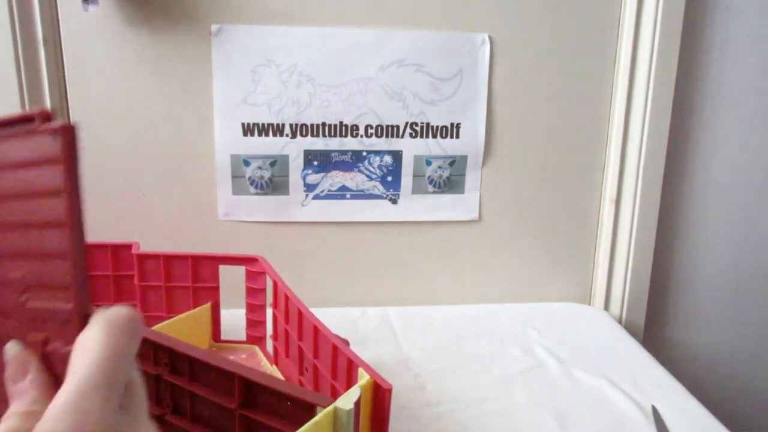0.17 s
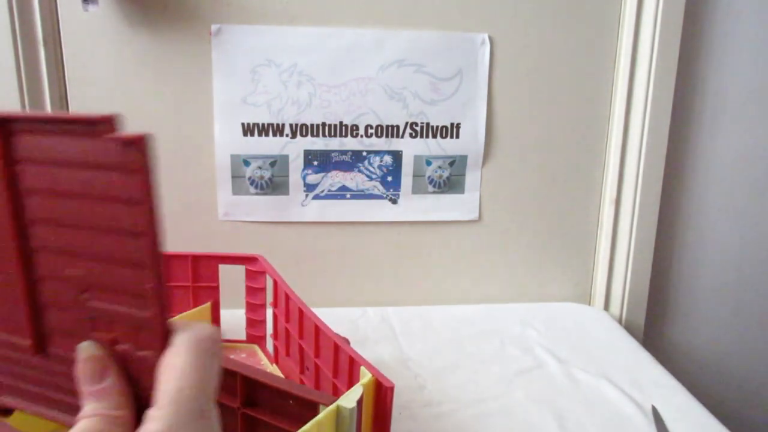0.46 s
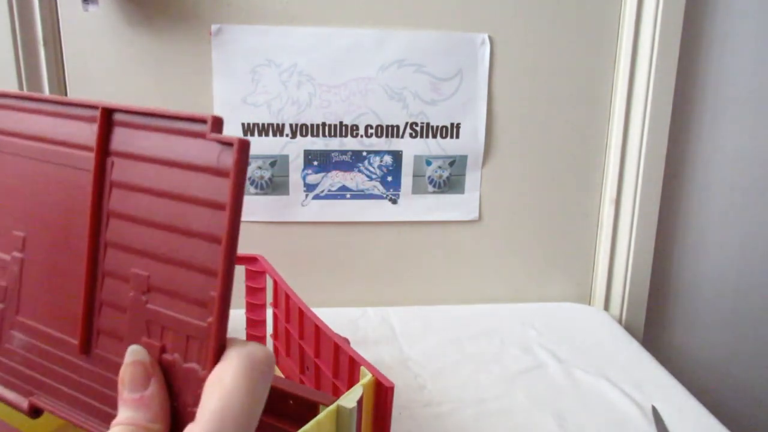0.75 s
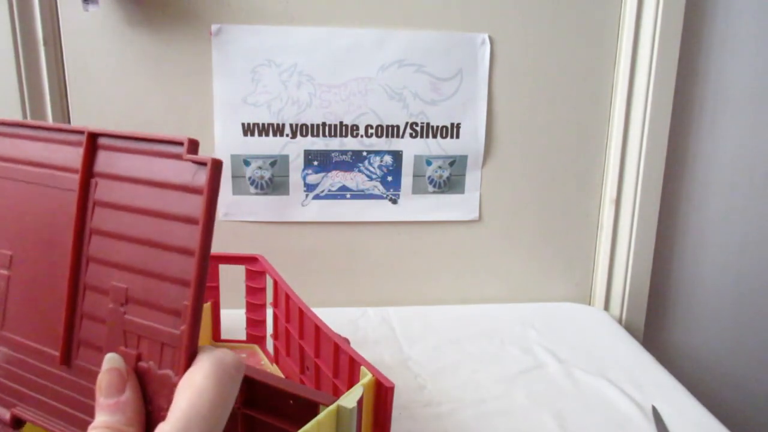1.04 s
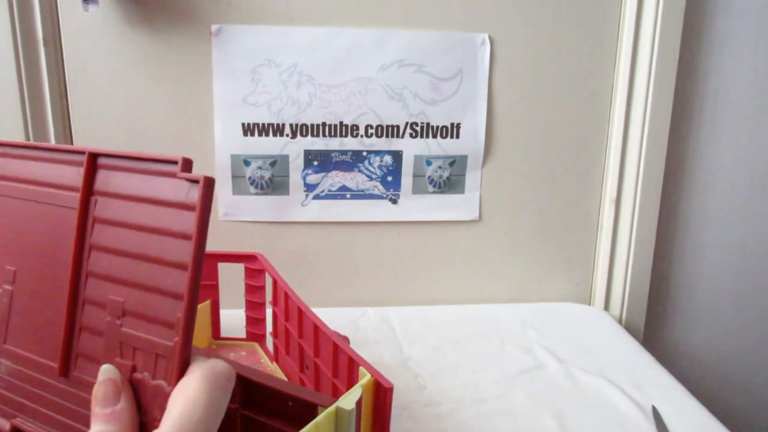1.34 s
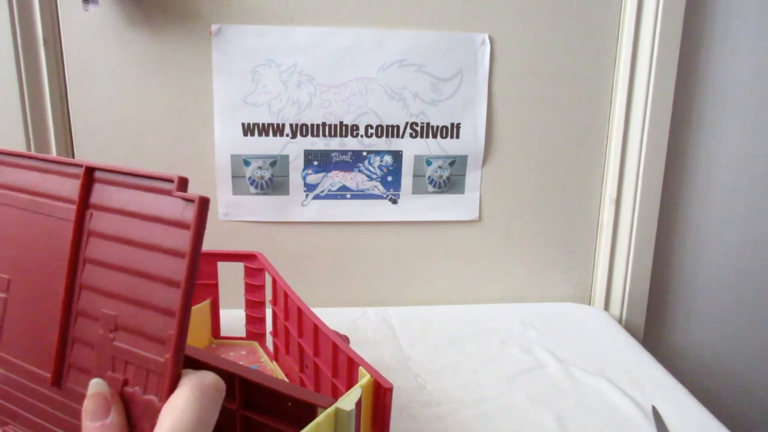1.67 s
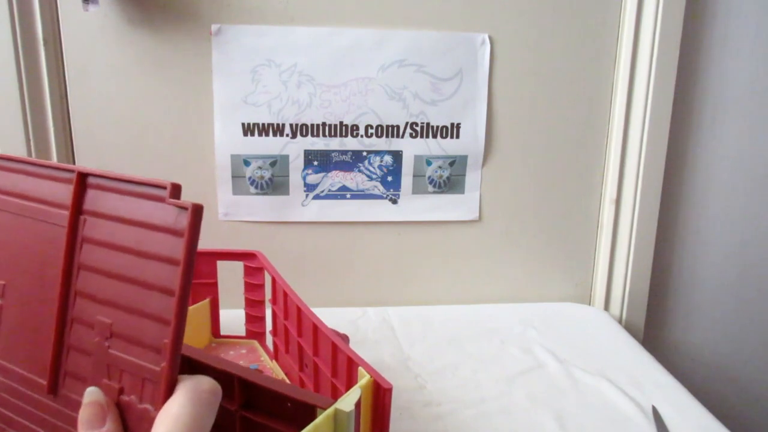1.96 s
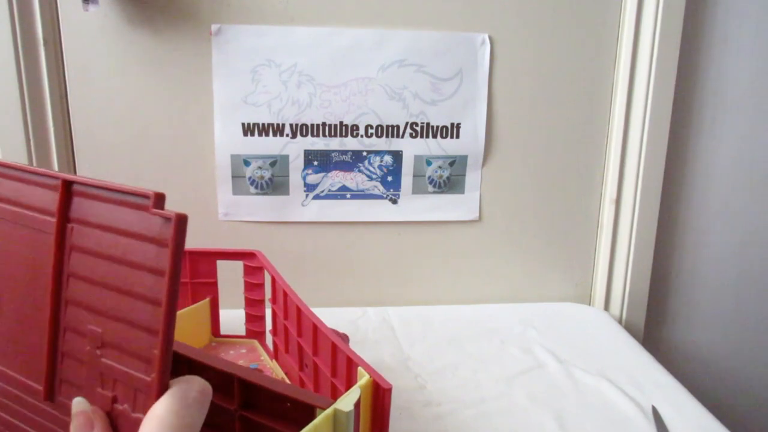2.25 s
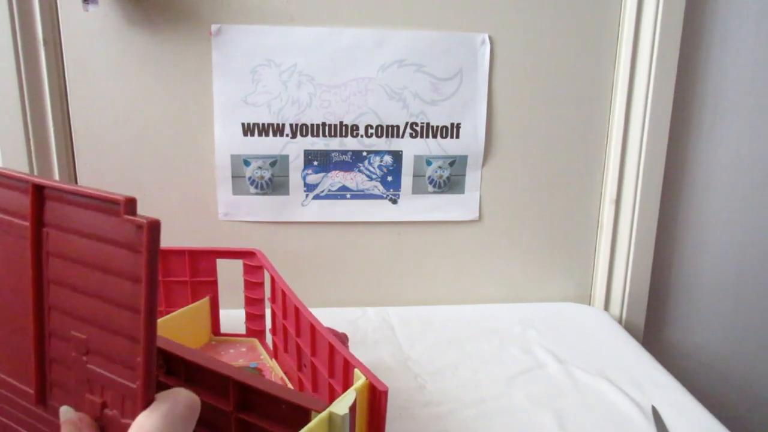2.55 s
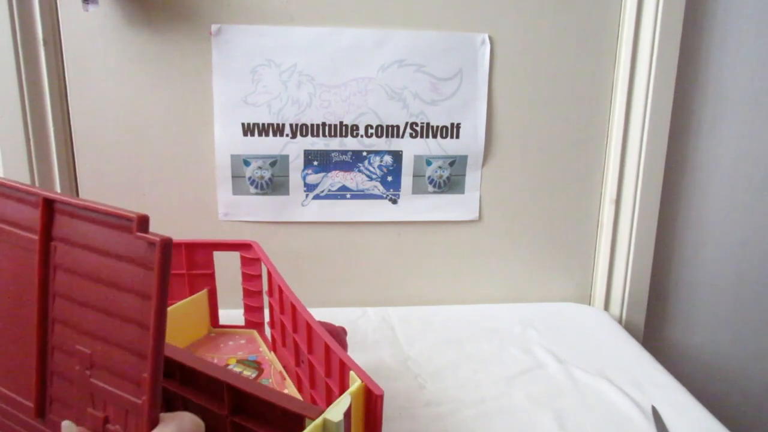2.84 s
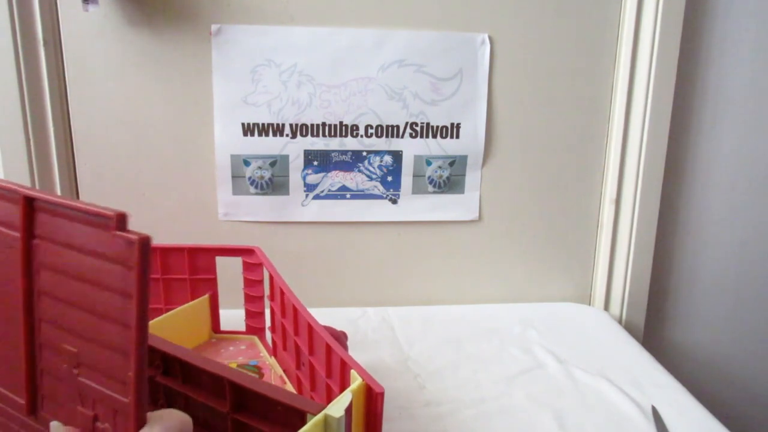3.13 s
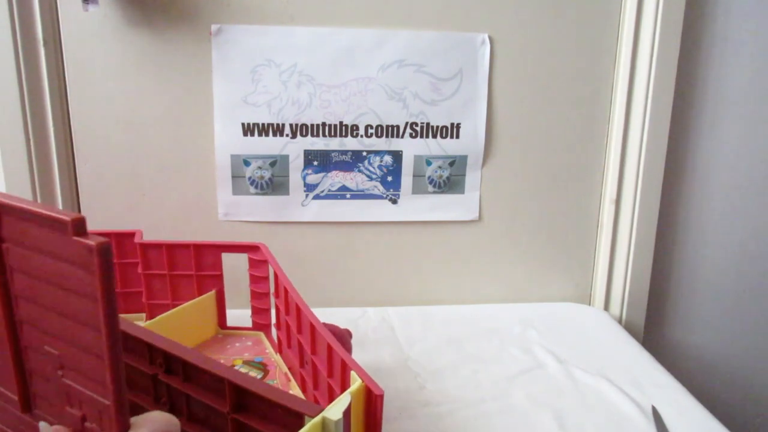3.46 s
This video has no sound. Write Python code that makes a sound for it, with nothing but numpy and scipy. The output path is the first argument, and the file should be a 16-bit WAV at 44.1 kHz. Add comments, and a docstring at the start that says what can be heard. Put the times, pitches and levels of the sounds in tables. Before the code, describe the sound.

A hard plastic panel is fitted onto a toy house: a thud and loud sharp snap at once, hollow knocks just after one second, then faint ticks and rubbing, close microphone in a small room.

```python
"""A sharp snap, then hollow knocks, small ticks and the rubbing of parts, with a thin high hiss later on. Hands
fit a hard plastic roof panel onto a toy house on a table in a small room. Blows and tiny slips set decaying
sines (modes) ringing in the walls, ribs and edges; cracks and slides are shaped noise. Echoes follow; the
background hiss drops at first and then its level mostly climbs."""
import sys
import numpy as np
from scipy import signal
from scipy.fft import rfft, irfft
from scipy.io import wavfile
from scipy.ndimage import uniform_filter1d

SR = 44100
rng = np.random.default_rng(int(sys.argv[2]) if len(sys.argv) > 2 else 0)


def wrap_up_sound(samples):
    """Save the sound to the file named by the first command line argument, as 16-bit audio."""
    columns = np.atleast_2d(samples).T
    # keep every value between -1 and 1, then stretch to whole-number steps
    tamed = np.clip(columns, -1, 1)
    steps = np.round(tamed * 32767).astype(np.int16)
    wavfile.write(sys.argv[1], SR, steps)


N = 158760  # length in samples

# In all tables, a ring time is how long a tone takes to fall by 60 dB.
# Knocks and clicks of plastic on plastic. Each row: start in seconds, blow level in dB, then body, middle
# and tick levels in dB relative to it (before the trims below), favoured body tone in Hz, favoured middle
# tone in Hz, share of the ring time left by the grip (1 = free).
CONTACTS = [(0.0, -9.5, -8, -22, -26.5, 120, 1230, 1.83), (0.011, -25, 2.5, -9.5, -45, 115, 1500, 1.15),
            (0.0848, 3, -18, -17, -8.5, 760, 3000, .7), (0.0885, -3.5, -13.5, -15, -17, 740, 2900, .9),
            (0.13, -7, -20.5, -13.5, -16.5, 520, 1693, 1.26),
            (0.224, -19.5, -27.5, -18.5, -12, 450, 1650, 2.7), (0.3112, -18, -9.5, -8, -7, 430, 1930, 0.45),
            (0.325, -21.5, -13, -13, -7, 390, 1700, 1.9), (0.3403, -20, -13, -1.5, -26, 580, 2080, 0.7),
            (0.3445, -30, -1.5, -3, -32, 300, 1780, 0.54), (0.355, -38.5, -4.5, 0, -2, 520, 1760, 1.2),
            (0.641, -29.5, -1, -17.5, -30, 276, 876, 1.1), (0.666, -21, -8, -25.5, -40.5, 304, 902, 1.1),
            (0.682, -35, -2.5, -12, -37, 400, 900, 0.62), (0.714, -28.5, -3.5, -30, -38, 340, 915, .45),
            (0.831, -34, -10.5, -13, -32.5, 670, 910, 0.32), (0.850, -26, -14.5, -14, -35, 350, 1090, 1.4),
            (0.878, -32, -6.5, -8.5, -32.5, 160, 900, 1.4), (1.133, -11, -2.5, -6, -22.5, 523, 1370, 0.8),
            (1.1457, -17.5, -5.5, -23, -52, 337, 1400, 0.56), (1.16, -15, -17, -23, -25, 400, 1700, 1.6),
            (1.264, -9.5, -9, -16.5, -41, 450, 1210, 0.52), (1.276, -19.5, -4, -20, -43, 415, 1035, 1.48),
            (1.351, -29.5, -6.5, -14, -28, 500, 860, 0.66), (1.495, -32, -19, -4, -18.5, 1200, 777, 1.4),
            (1.518, -27.5, -10.5, -17, -33, 185, 2380, 1.5), (1.796, -37, -13.5, -21.5, -27, 510, 1700, .9),
            (1.821, -37, -14, -14, -21, 460, 864, 1), (2.058, -34, -10.5, -13, -20, 200, 1290, 0.98),
            (2.121, -26, 1, -5.5, -36, 670, 1260, 1.08), (2.126, -20, 3.5, -8, -40, 370, 1400, 0.24),
            (2.136, -25, -2.5, -21, -40.5, 200, 1380, 1.2), (2.151, -28, -4, -17, -40, 353, 1380, 1.06),
            (2.263, -33.5, -6, -8, -18, 390, 2340, 0.77), (2.428, -26, -13, -10, -22, 250, 1400, 1.2),
            (2.512, -28, -26, -5, -21, 1400, 920, 0.65), (2.518, -30, -17, -4, -16, 770, 1000, .9),
            (2.575, -25.5, -5, -13, -25, 320, 1100, 0.52), (2.610, -24.5, -6, -9, -36, 390, 900, 0.38),
            (2.622, -29, -3.5, -12, -31, 230, 1500, 0.87), (2.712, -24, -22, -16, -21, 530, 1000, 1.8),
            (2.759, -26, -15, -8.5, -18.5, 540, 1810, 1.1),
            (2.856, -30.5, -15.5, -9, -17.5, 509, 2000, 1.5), (2.93, -26.5, -9.5, -21, -17, 480, 902, 0.54),
            (2.996, -20.5, -11, -10.5, -12.5, 590, 1240, 1.2),
            (3.012, -14, -10.5, -10, -22.5, 490, 2220, .9), (3.348, -36.5, -10, -9.5, -11.5, 500, 1300, 1),
            (3.43, -34, -3, -11, -32.5, 540, 1300, 0.6), (3.467, -29.5, -17, -9, -10, 530, 1200, 0.62),
            (3.489, -34, -3.5, -19, -12, 160, 570, 1.2), (3.56, -26, -10, -12.5, -12.5, 490, 1560, 1.2),
            (3.569, -25, -6.5, -8.5, -30, 360, 1250, 0.47)]
# Modes of the hollow walls. Each row: tone in Hz, relative level in dB, ring time in seconds before damping.
WALLS = [(80, -10.5, 0.16), (138.1, -2, 0.11), (210, -0.5, 0.14), (253.3, 0.5, 0.11), (346.3, -3, 0.12),
         (399.7, -1, 0.1), (522, -3, 0.12), (600.4, -4.5, 0.083), (708.5, 3, 0.079), (814, -6, 0.088)]
# Modes of the stiff ribs. Each row: tone in Hz, relative level in dB, ring time in seconds before damping.
RIBS = [(913, 5.5, .025), (1154, -3.5, 0.031), (1365.5, -3.5, .045), (1688, -4.5, 0.032),
        (1970, -3.5, 0.027), (2261, -4.5, 0.057), (2635, -3.5, .03), (3013, -3, 0.041), (3350, -4.5, 0.048)]
# Modes of the thin edges. Each row: tone in Hz, relative level in dB, ring time in seconds before the limit.
EDGES = [(3250, -1, 0.0073), (4050, -0.5, .009), (5120, 1, 0.0065), (6510, -1.5, .007), (7100, 6.5, 0.002),
         (8960, 14, 0.0046), (10240, -7.5, 0.0081), (11070, -6, 0.0069), (12600, 1.5, 0.004),
         (15200, 10, 0.0035)]
# Colour of the noisy crack and its tail. Each row: frequency in Hz, relative level in dB per Hz.
CRACK_COLOUR = [(710, -35.5), (1200, -6.5), (2070, -15), (2480, -11), (2980, -5.5), (5310, -15.5),
                (9470, -18), (14200, -29.5), (15500, -25)]
# Harder ticks favour higher edge tones. Each row: tick level in dB, favoured tone in Hz.
BRIGHTER = [(-42.5, 4300), (-23, 6600), (-9, 11000)]
# Level of the room noise over time. Each row: time in seconds, level in dB before ROOM_NOISE_DB is added.
BACKGROUND = [(0.0, -53), (0.18, -92.5), (0.33, -72), (0.56, -71), (1.06, -67.5), (2.58, -61.5),
              (3.27, -62), (3.6, -62)]
# Colour of the room noise. Each row: frequency in Hz, relative level in dB per Hz.
ROOM_NOISE = [(15, -49.5), (25, -13), (59, -11.5), (96, -8), (193, -7.5), (804, -15), (919, -14.5),
              (1200, -18), (1570, -16), (2490, -21.5), (3000, -23.5), (10100, -31.5), (14300, -38),
              (15500, -55.5)]
# Faint narrow bands in the room noise. Each row: centre in Hz, width in Hz, level in dB relative to the noise.
WHINES = [(874, 51, -12), (1550, 38, -12)]
# Strokes of parts rubbing. Each row: start in seconds, length in seconds, body, middle and treble levels in dB
# (before the drag levels below), favoured body tone in Hz, favoured middle tone in Hz.
RUB = [(0.116, 0.083, -37.5, -40, -50.5, 405, 1470), (0.312, 0.066, -40, -37.5, -47.5, 390, 1990),
       (0.635, 0.096, -48, -54, -75.5, 410, 877), (0.853, 0.072, -57, -63, -77, 640, 2200),
       (0.865, 0.087, -57, -54, -74, 940, 940), (0.904, 0.19, -58, -55.5, -72, 400, 940),
       (1.271, 0.094, -37, -52, -70, 315, 1010), (1.344, 0.17, -53.5, -59, -80, 550, 1000),
       (1.478, 0.08, -39, -50.5, -70, 420, 993), (1.777, 0.078, -45, -60, -75, 400, 1000),
       (1.912, 0.078, -51, -58.5, -83, 345, 1000), (2.055, 0.1, -47, -54.5, -65, 440, 1700),
       (2.123, 0.071, -46.5, -57, -84, 520, 1400), (2.262, 0.034, -55, -66, -78, 570, 2000),
       (2.345, 0.072, -50.5, -52.5, -61, 540, 2070), (2.396, 0.13, -45.5, -45.5, -65, 550, 1260),
       (2.508, 0.024, -40, -44, -51, 710, 2880), (2.563, 0.1, -43, -61, -79, 215, 1000),
       (2.669, 0.19, -43, -44, -63.5, 556, 1700), (2.923, 0.069, -41.5, -53, -61, 530, 990),
       (2.994, 0.061, -34, -40.5, -56.5, 1140, 1090), (3.162, 0.098, -56, -74, -67, 530, 1183),
       (3.295, 0.097, -44, -53, -67, 560, 980), (3.428, 0.078, -47, -67, -69, 480, 1200)]
# Fingertip slides with a thin high hiss. Each row: time in seconds, level in dB.
SLIDE = [(2.3, -82), (2.36, -58.5), (2.42, -61), (2.47, -87), (2.55, -63), (2.63, -95)]

# How modes share a blow: spread around the favoured tone, weakest share, chance per mode and blow
TONE_OCTAVES, EDGE_OCTAVES, FAR_DB = 0.52, 0.34, -15.5
SCATTER_DB, DETUNE = 3, 0.015  # the grip shifts each mode a little from blow to blow
# Contacts: level trims, longest ring times before the grip acts, longest ring that is computed
WALLS_DB, RIBS_DB, EDGES_DB, CRACK_DB = -2, -4.5, -0.5, -5
WALL_T60_MAX_S, RIB_T60_MAX_S, EDGE_T60_MAX_S, RING_S = 0.13, 0.05, 0.01, 0.3
SOFT_HZ = 1499  # the walls are pushed softly: less treble above this
TOUCH_S = 0.002  # a hard contact is a short rattle, not one impulse
CRACK_T60_S, CRACK_TAIL_T60_S, CRACK_TAIL_DB = 0.029, 0.25, -19
# The catch that springs in the hardest snap, and the table top that hums after it
CATCH_HZ, CATCH_T60_S, CATCH_DB = 3120, 0.014, -4.04
TABLE_HZ, TABLE_T60_S, TABLE_DB = 175, 1.0, -42.18
# Room
ROOM_NOISE_DB = 11
ROOM_T60_S, ROOM_DB = 0.12, -13.5
# Rubbing: average slips per second, their unevenness in dB, ring time factor, rising share of a stroke
RUB_PER_S, RUB_ROUGH_DB, RUB_DAMPING, RUB_RISE = 1800, 3.6, 0.71, 0.35
WALL_DRAG_DB, RIB_DRAG_DB, RASP_DB, GRIT_DRAG_DB = -24, -20, -18, 7  # how strongly slips drive each part
RASP_HZ, GRIT_HZ = 4386, (3450, 7260)  # tone the edges rasp around; band of the gritty noise
JUDDER_DB, JUDDER_S = 1.5, 0.006  # the grip on a rubbing part is uneven
SLIDE_HZ = 11000
OVERLOAD, CUTOFF_HZ = 0.9, 15800  # level at which the input clips; top of the treble


def amp(db):
    """Turn dB into a plain multiplier."""
    return 10 ** (np.asarray(db) / 20)


def rms_one(x):
    """Scale a signal to an average (rms) level of 1."""
    return x / np.sqrt(np.mean(x ** 2) + 1e-20)


def level_in_time(rows):
    """Join the (seconds, dB) points with straight lines, one value per sample."""
    s, db = np.transpose(rows)
    return np.interp(np.arange(N) / SR, s, db)


def colour(x, points):
    """Shape the spectrum with a (Hz, dB) table."""
    hz, db = np.transpose(points)
    f = np.arange(len(x) // 2 + 1) * SR / len(x) + 1  # + 1 avoids log(0)
    gain = amp(np.interp(np.log(f), np.log(hz), db))
    return irfft(rfft(x) * gain, len(x))


def band(x, low_hz, high_hz):
    """Keep only the sound between two frequencies."""
    return signal.sosfilt(signal.butter(2, [low_hz, high_hz], "band", fs=SR, output="sos"), x)


def soft(x):
    """A soft push excites little treble."""
    return signal.sosfilt(signal.butter(2, SOFT_HZ, fs=SR, output="sos"), x)


def train(s, gains):
    """Place one click at each time."""
    out = np.zeros(N)
    out[np.clip((s * SR).astype(int), 0, N - 1)] = gains
    return out


def fading(clicks, t60):
    """Envelope that jumps at each click and dies away; energies add."""
    return np.sqrt(signal.lfilter([1], [1, -amp(-120 / (t60 * SR))], clicks ** 2 + 1e-18))


def ring(clicks, hz, t60):
    """A resonator: a unit click sets a dying sine of height 1 ringing."""
    r = amp(-60 / (max(t60, 0.002) * SR))
    w = 2 * np.pi * hz / SR
    return signal.lfilter([0, np.sin(w)], [1, -2 * r * np.cos(w), r * r], clicks + 1e-18)


def near(hz, tone, octaves):
    """A mode gets weaker, in dB, the further it lies from the favoured tone."""
    return np.maximum(-6 * (np.log2(hz / tone) / octaves) ** 2, FAR_DB)


def strike(modes, drive, tone, octaves, longest=1):
    """Sum resonators pushed by a force; drive(dB per event) makes the force for one mode."""
    out = np.zeros(N)
    for k, (hz, db, t60) in enumerate(modes):
        force = drive(db + near(hz, tone, octaves))
        out += (-1) ** k * ring(force, hz, min(t60, longest))  # signs alternate
    return out


def knock(modes, s, db, tone, free, longest):
    """Every blow rings the modes with its own strengths, damping and slight detuning."""
    out = np.zeros(N + SR)
    t = np.arange(int(RING_S * SR)) / SR
    hz, level_db, t60 = np.transpose(modes)[:, :, None]
    chance = rng.standard_normal((len(s), 2, len(modes), 1))
    starts = ((s + TOUCH_S / 3) * SR).astype(int).clip(0)
    for k, i in enumerate(starts):
        gain_db = db[k] + level_db + near(hz, tone[k], TONE_OCTAVES) + SCATTER_DB * chance[k, 0]
        fall_db = 60 * t / (np.minimum(t60, longest) * max(free[k], 0.2))
        shifted_hz = hz * (1 + DETUNE * chance[k, 1])
        waves = amp(gain_db - fall_db) * np.sin(2 * np.pi * shifted_hz * t)
        out[i:i + len(t)] += waves[::2].sum(axis=0) - waves[1::2].sum(axis=0)
    return out[:N]


def contacts():
    """Each contact rings walls, ribs and edges and gives a short noisy crack with a tail."""
    s, peak, body, middle, tick, body_hz, middle_hz, free = np.transpose(CONTACTS)
    touch = np.hanning(int(TOUCH_S * SR))
    touch = touch / np.sqrt(np.sum(touch ** 2))

    def touches(db):
        return np.convolve(train(s, amp(db)), touch)[:N]

    def rattle(mode_db):
        return touches(peak + tick + EDGES_DB + mode_db) * rng.standard_normal(N)

    walls = soft(knock(WALLS, s, peak + body + WALLS_DB, body_hz, free, WALL_T60_MAX_S))
    ribs = knock(RIBS, s, peak + middle + RIBS_DB, middle_hz, free, RIB_T60_MAX_S)
    edge_hz = np.interp(peak + tick, *np.transpose(BRIGHTER))
    edges = strike(EDGES, rattle, edge_hz, EDGE_OCTAVES, EDGE_T60_MAX_S)

    clicks = touches(peak + tick + CRACK_DB)
    # the added first point keeps low frequencies out of the crack
    noise = rms_one(colour(rng.standard_normal(N), [(500, -46)] + list(CRACK_COLOUR)))
    tail = amp(CRACK_TAIL_DB) * fading(clicks, CRACK_TAIL_T60_S)
    crack = noise * (fading(clicks, CRACK_T60_S) + tail)

    hardest = np.argmax(peak)
    snap_s = s[hardest:hardest + 1]
    catch = ring(train(snap_s + TOUCH_S / 2, amp(CATCH_DB)), CATCH_HZ, CATCH_T60_S)
    table = ring(train(snap_s, amp(TABLE_DB)), TABLE_HZ, TABLE_T60_S)
    return walls + ribs + edges + crack + catch + table


def background():
    """Room noise: coloured noise with faint narrow bands, all following one level curve."""
    noise = rms_one(colour(rng.standard_normal(N), ROOM_NOISE))
    for hz, width_hz, db in WHINES:
        whine = band(rng.standard_normal(N), hz - width_hz / 2, hz + width_hz / 2)
        noise = noise + amp(db) * rms_one(whine)
    return amp(level_in_time(BACKGROUND) + ROOM_NOISE_DB) * noise


def room(x):
    """Diffuse echoes: each sound is followed by a burst of dying noise after a short gap."""
    t = np.arange(SR // 2) / SR
    tail = rng.standard_normal(len(t)) * amp(-60 * t / ROOM_T60_S) * (t > 0.004)
    tail = tail / np.sqrt(np.sum(tail ** 2))
    return amp(ROOM_DB) * signal.fftconvolve(x, tail)[:N]


def micro_slips():
    """Rubbing surfaces stick and slip: dense random clicks of uneven strength and either direction."""
    happens = rng.random(N) < RUB_PER_S / SR
    strength = amp(RUB_ROUGH_DB * np.minimum(rng.exponential(1, N), 4))
    slips = rms_one(happens * strength * rng.choice([-1, 1], N))
    width = int(JUDDER_S * SR)
    judder = uniform_filter1d(uniform_filter1d(rng.standard_normal(N), width), width)
    return rms_one(slips * amp(JUDDER_DB * rms_one(judder)))


def rubbing():
    """Micro-slips under each stroke drive the same walls, ribs and edges; hands damp walls and ribs."""
    start, length, body, middle, treble, body_hz, middle_hz = np.transpose(RUB)
    step = 32  # samples between points of the stroke shape
    done = np.clip((np.arange(0, N, step) / SR - start[:, None]) / length[:, None], 0, 1)
    strokes = np.minimum(done / RUB_RISE, (1 - done) / (1 - RUB_RISE)) ** 0.5
    slips = micro_slips()

    def drag(db):
        """Return a force maker for strike(): slips shaped by the strokes."""
        def force(mode_db):
            return slips * np.repeat(amp(db + mode_db) @ strokes, step)[:N]
        return force

    def damped(modes):
        return [(hz, db, t60 * RUB_DAMPING) for hz, db, t60 in modes]

    walls = soft(strike(damped(WALLS), drag(body + WALL_DRAG_DB), body_hz, TONE_OCTAVES))
    ribs = strike(damped(RIBS), drag(middle + RIB_DRAG_DB), middle_hz, TONE_OCTAVES)
    rasp_hz = np.full(len(start), RASP_HZ)
    rasp = strike(EDGES, drag(treble + RASP_DB), rasp_hz, TONE_OCTAVES, EDGE_T60_MAX_S)
    grit = band(drag(treble + GRIT_DRAG_DB)(0), *GRIT_HZ)
    return walls + ribs + rasp + grit


def slide():
    """Sliding fingertips make soft noise at the very top of the spectrum."""
    hiss = rms_one(band(rng.standard_normal(N), SLIDE_HZ, 16000))
    return amp(level_in_time(SLIDE)) * hiss


def scene():
    """The toy's sounds and their echoes, plus the room noise."""
    toy = contacts() + rubbing() + slide()
    return (toy + room(toy) + background())[None]


def record(dry):
    """The input clips peaks that are too loud, then a steep filter cuts the top."""
    clipped = np.clip(dry, -OVERLOAD, OVERLOAD)
    return signal.sosfilt(signal.cheby2(14, 65, CUTOFF_HZ, fs=SR, output="sos"), clipped)


dry = scene()
out = record(dry)
wrap_up_sound(out)
```